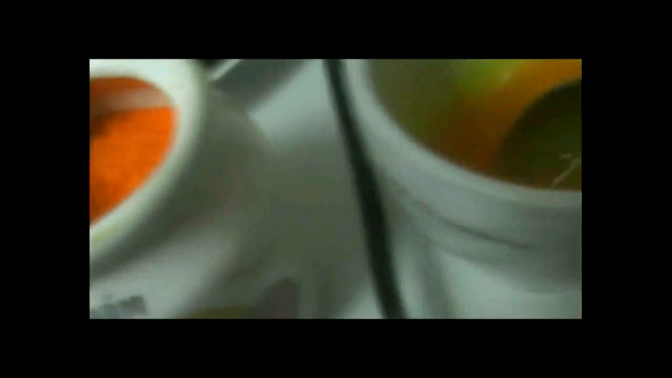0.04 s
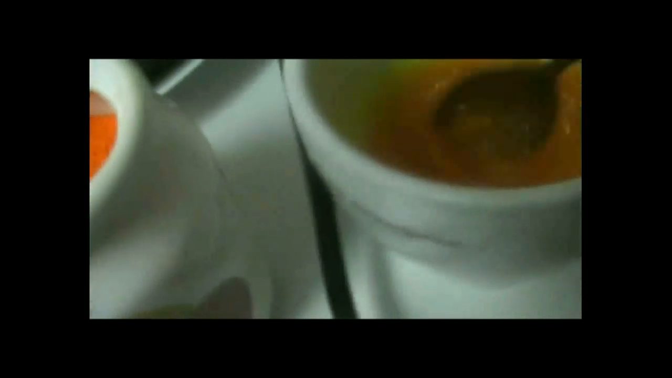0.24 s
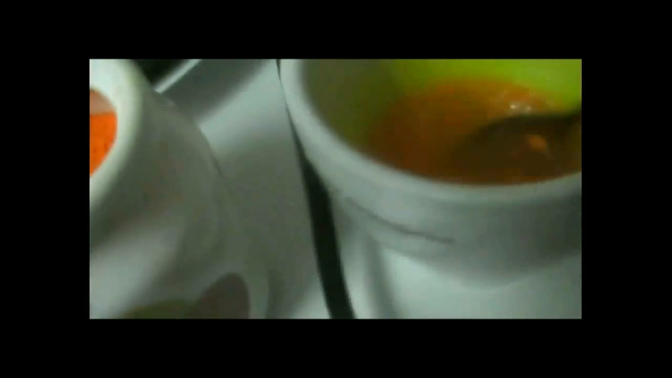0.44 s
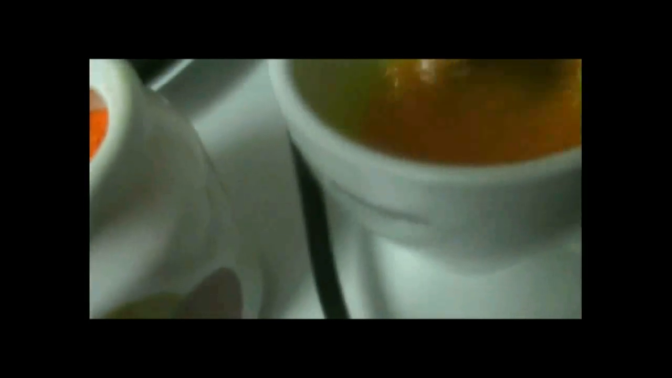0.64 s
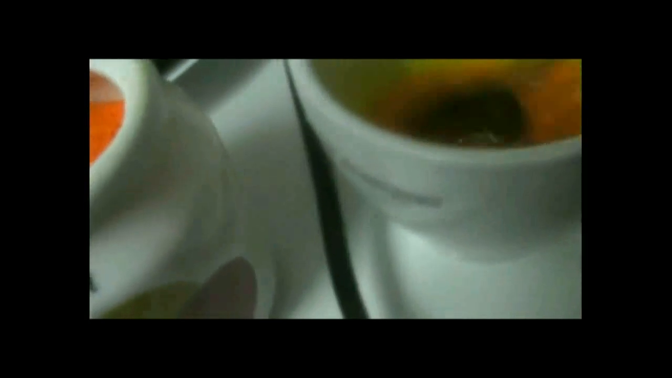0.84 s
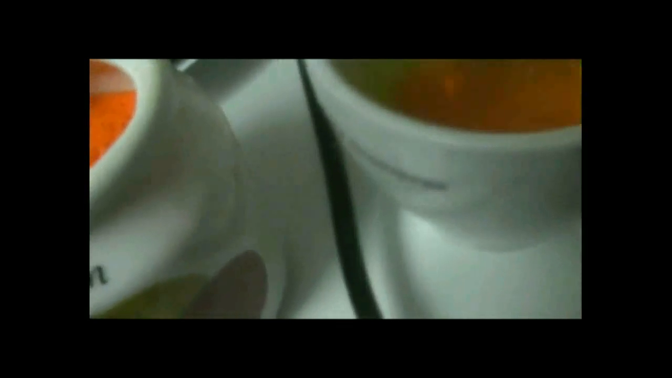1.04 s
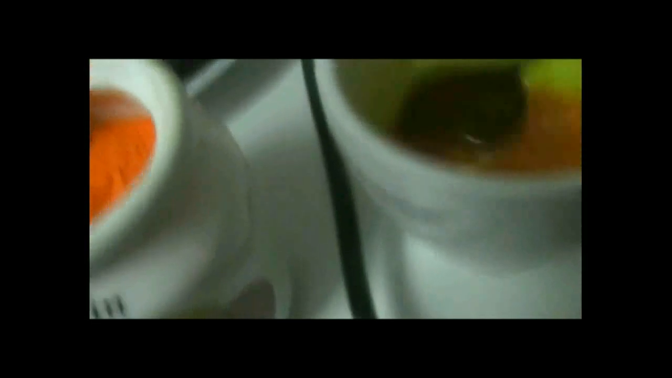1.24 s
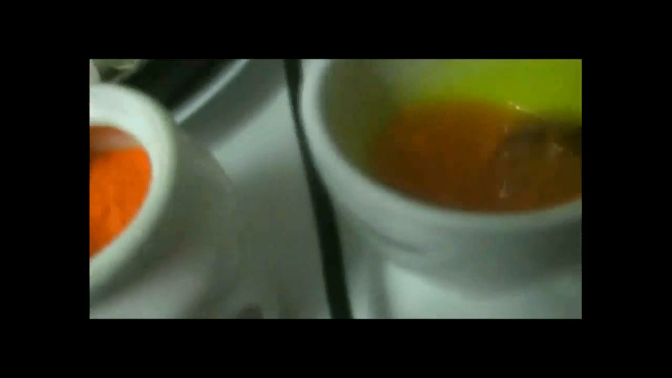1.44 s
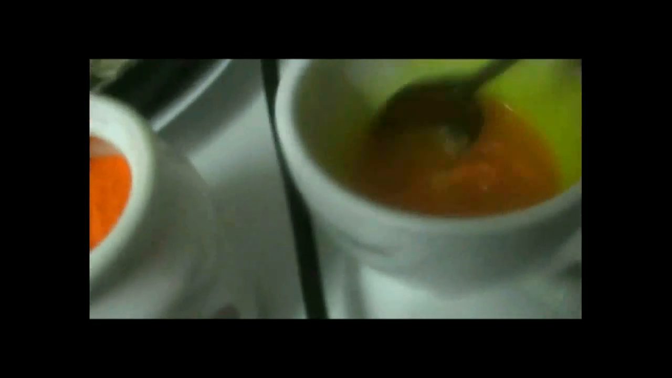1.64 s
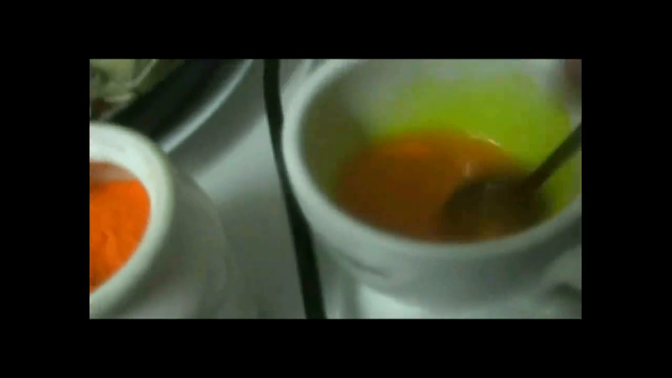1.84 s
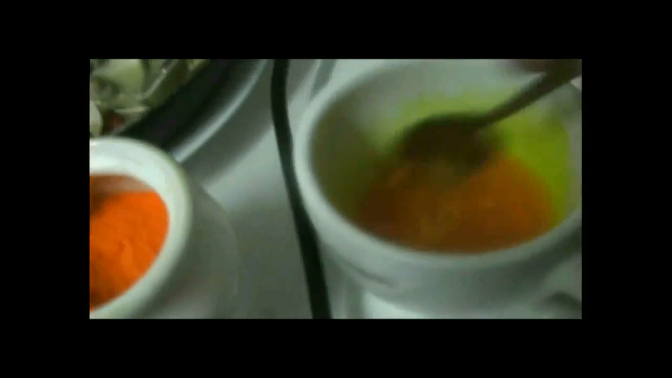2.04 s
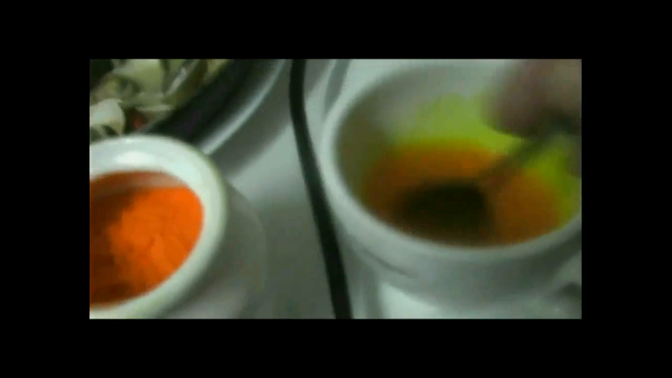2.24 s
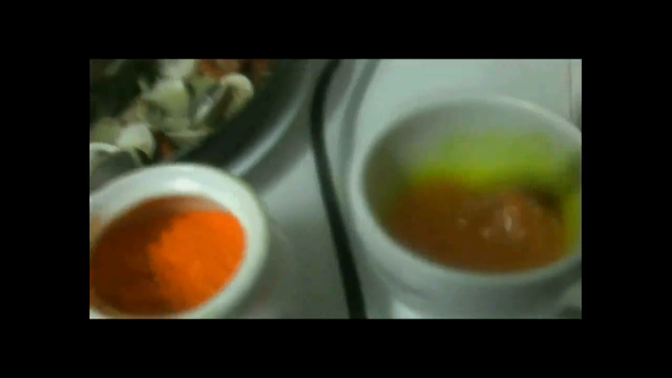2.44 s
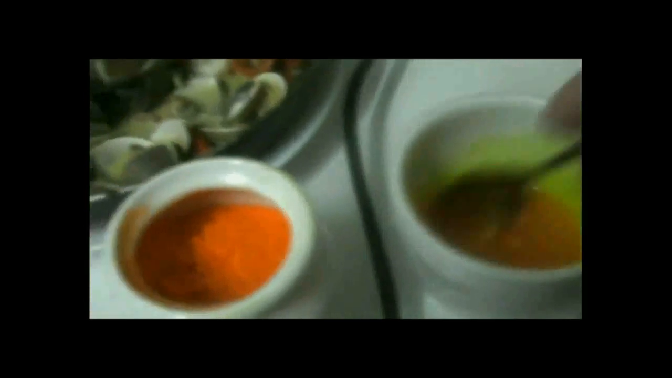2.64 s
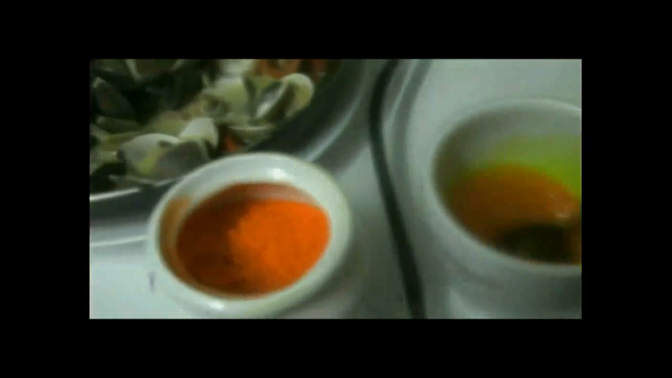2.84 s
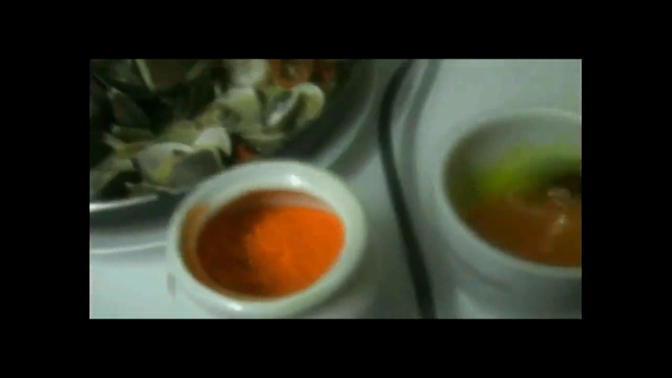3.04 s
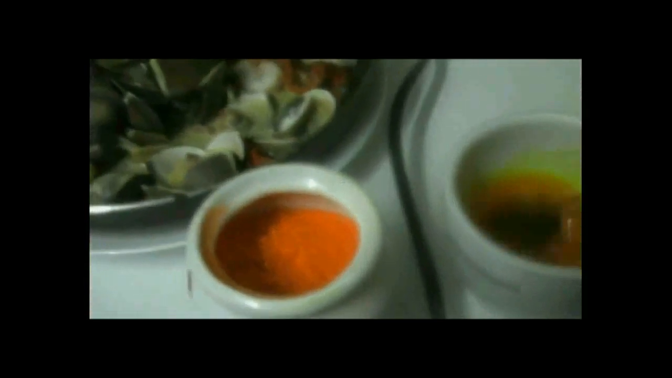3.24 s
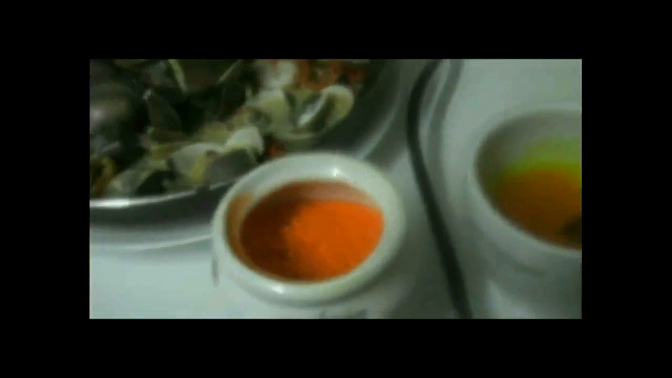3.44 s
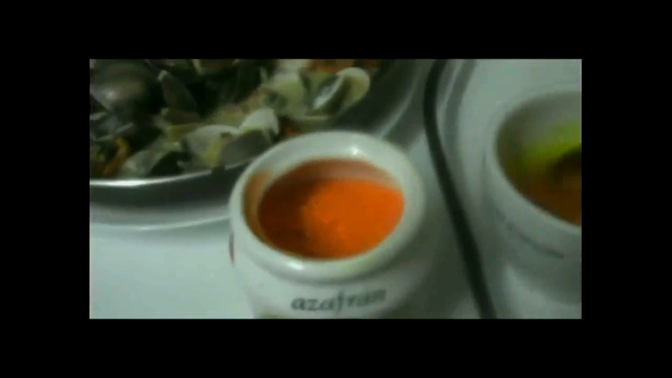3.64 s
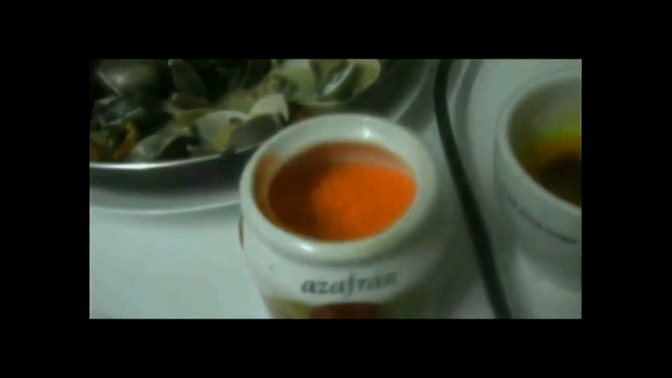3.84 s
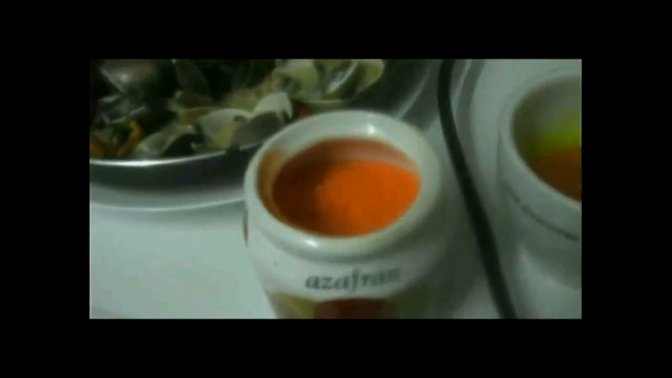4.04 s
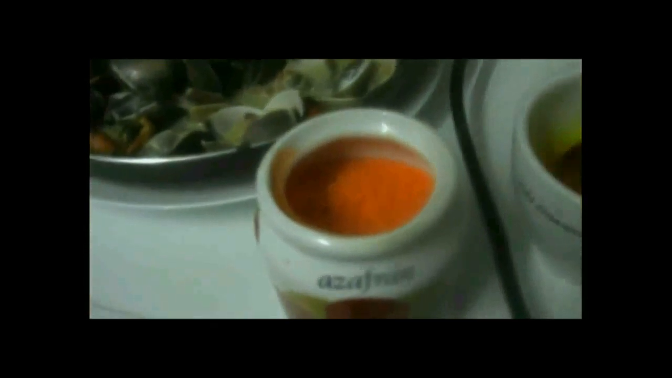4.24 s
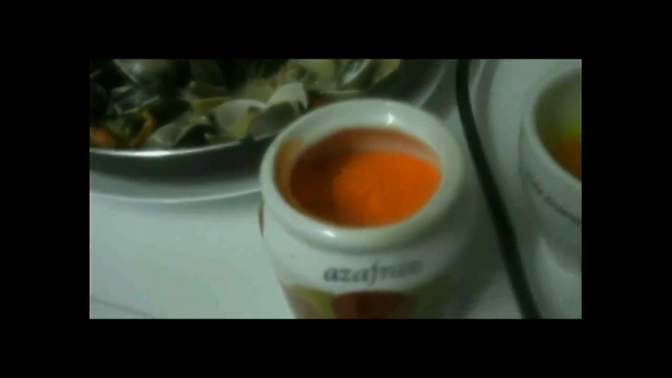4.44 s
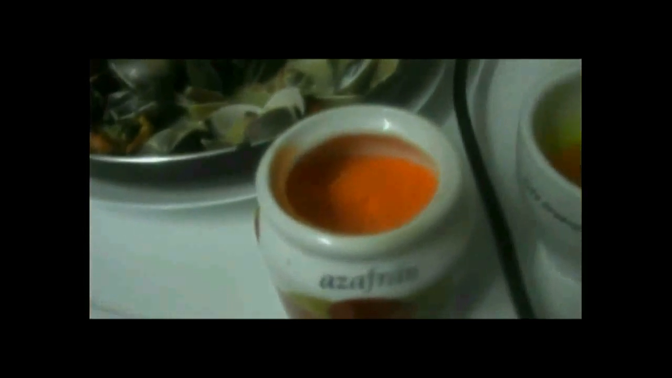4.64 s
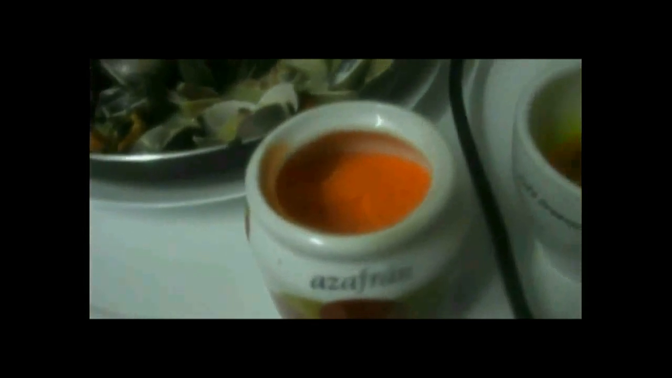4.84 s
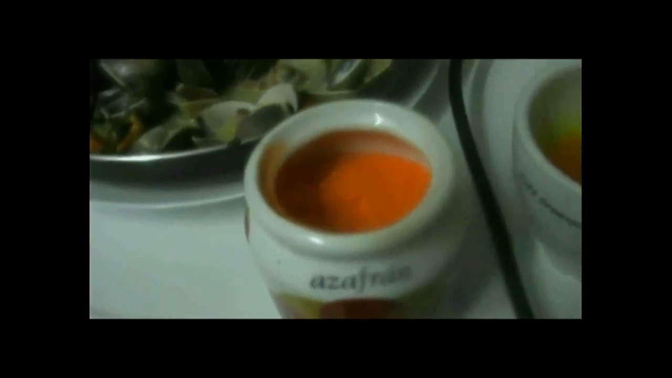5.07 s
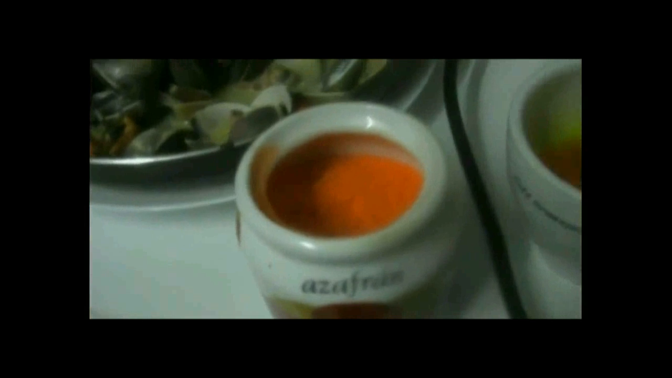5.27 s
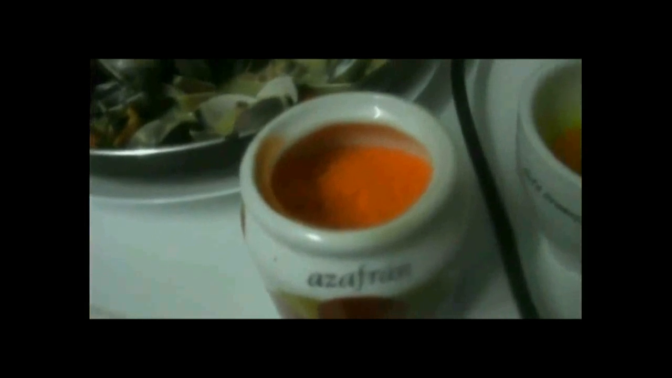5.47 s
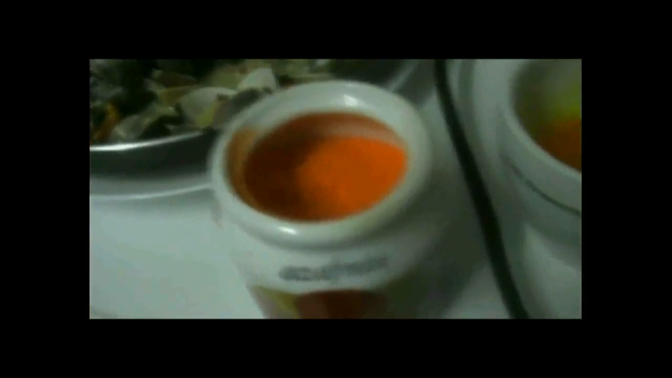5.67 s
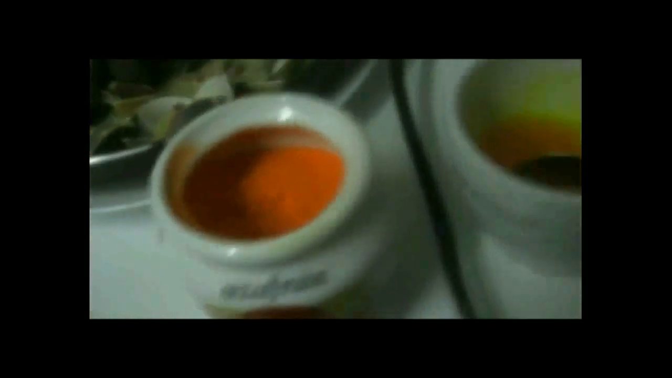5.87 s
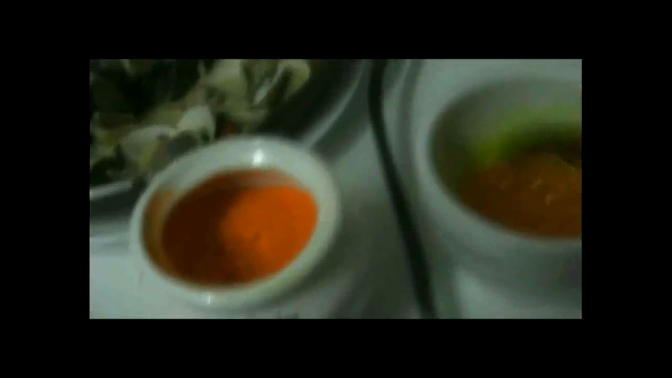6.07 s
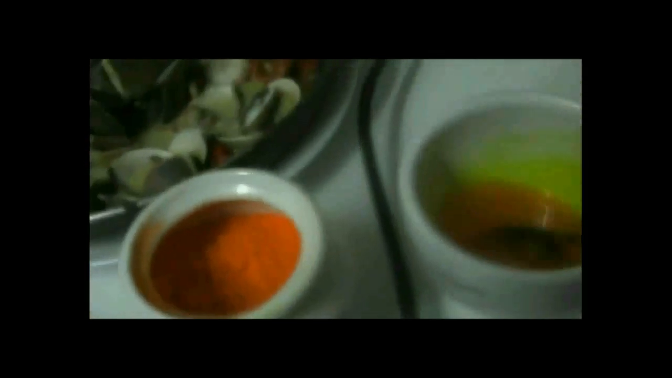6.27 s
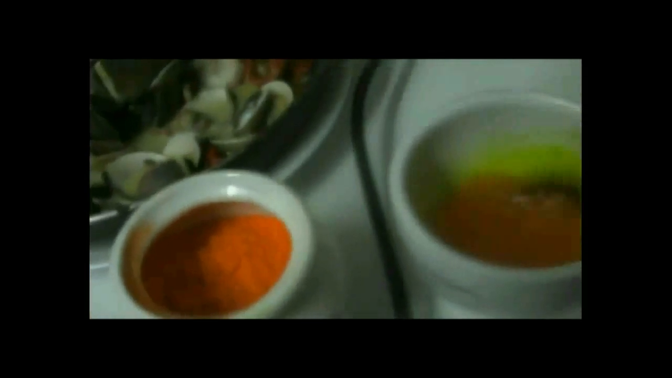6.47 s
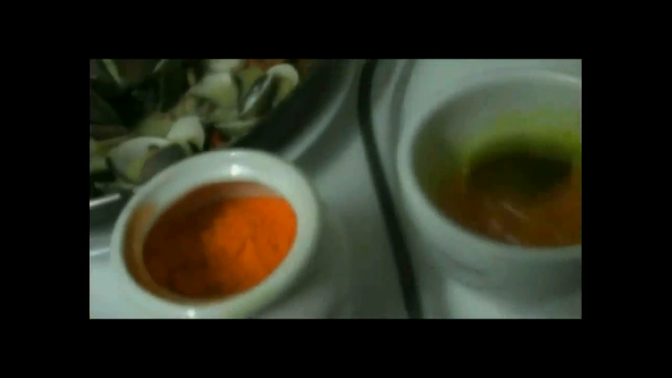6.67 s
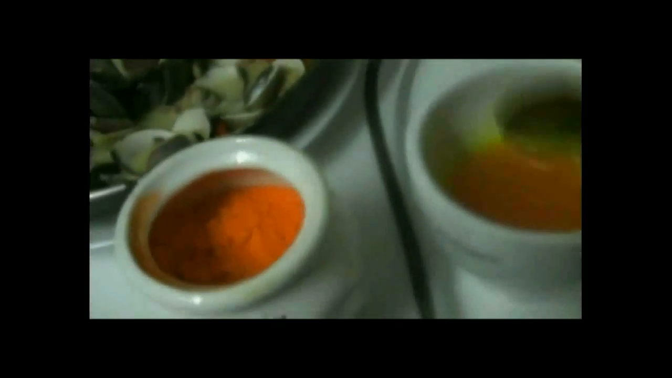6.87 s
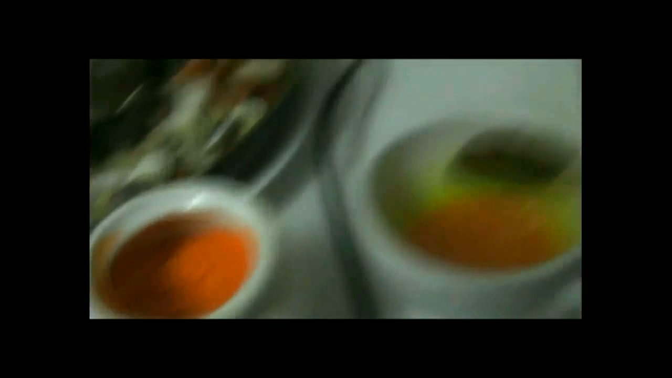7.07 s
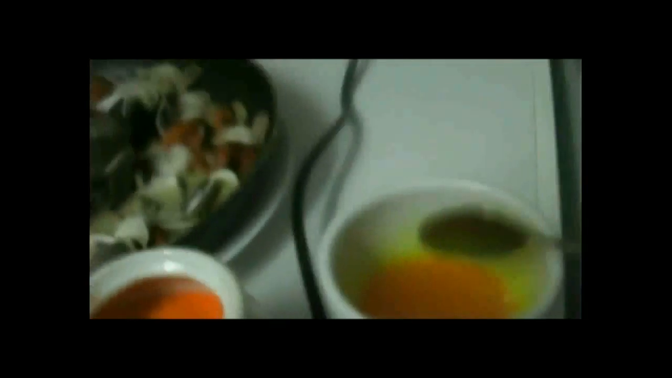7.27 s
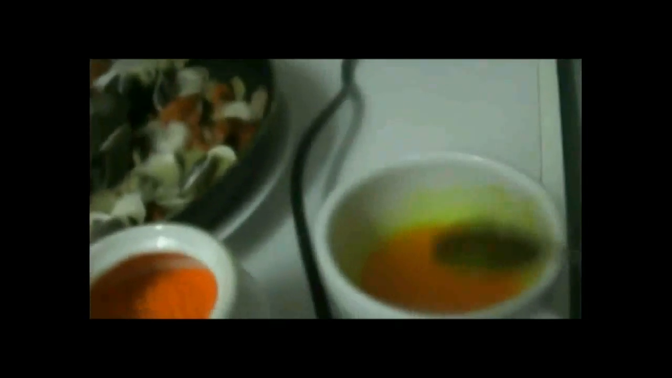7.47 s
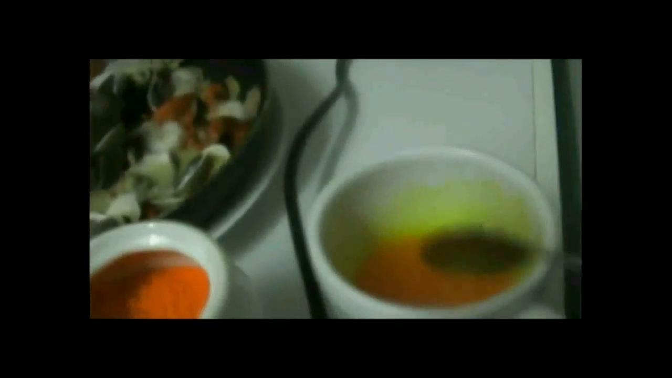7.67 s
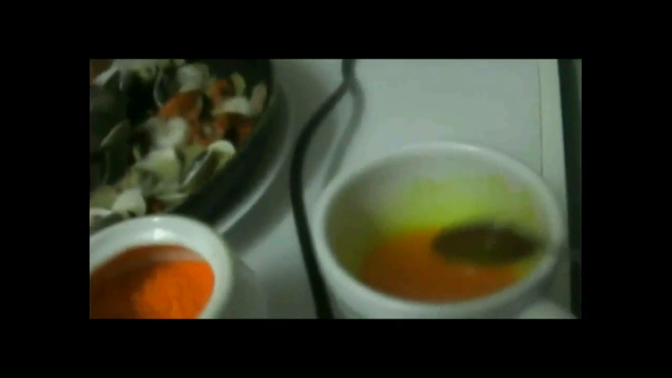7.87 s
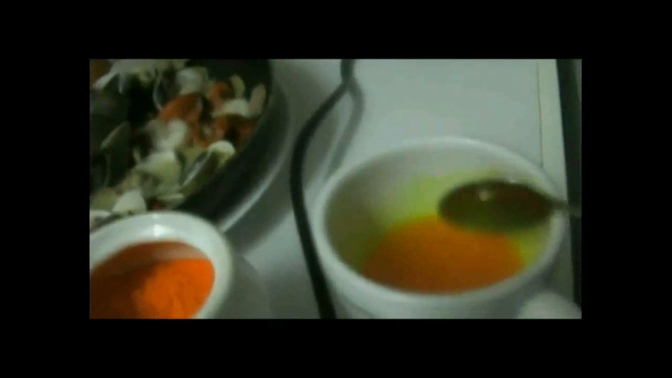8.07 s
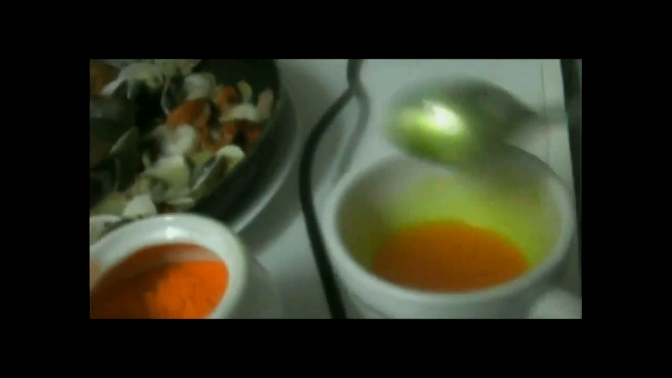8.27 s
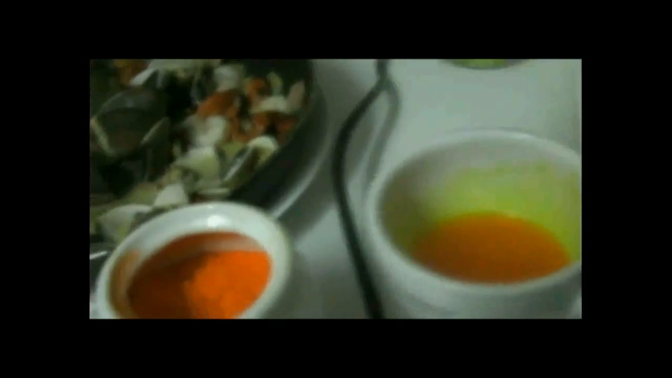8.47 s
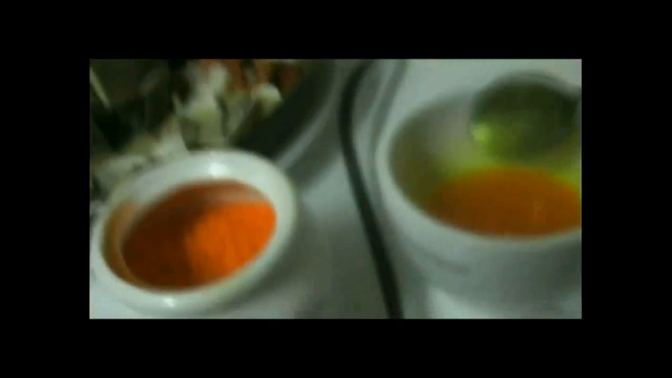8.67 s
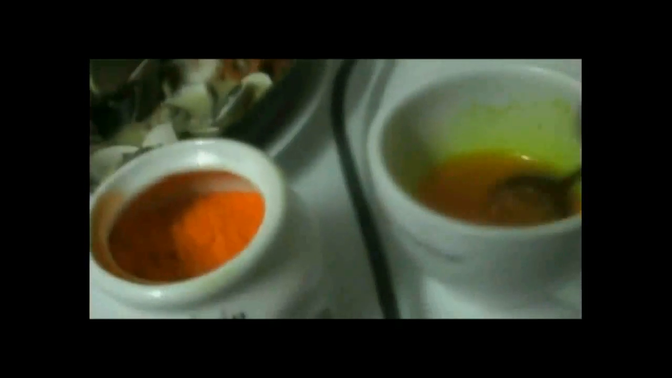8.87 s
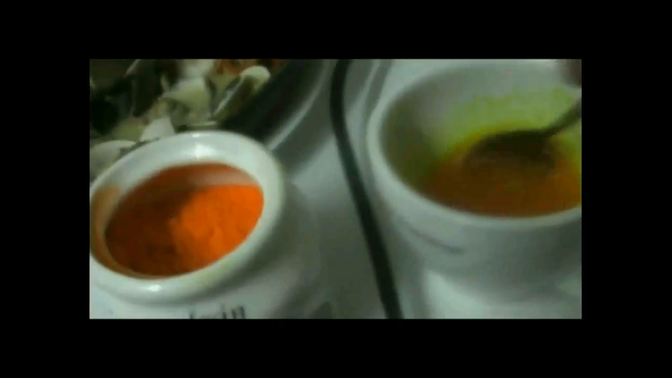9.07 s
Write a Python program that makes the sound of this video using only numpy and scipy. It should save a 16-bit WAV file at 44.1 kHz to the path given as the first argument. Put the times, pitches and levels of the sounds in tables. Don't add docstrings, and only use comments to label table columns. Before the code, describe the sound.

A metal spoon stirs thin sauce in a ceramic cup, picked up closely in stereo in a small kitchen with a short reverberation. From 0 to about 5.2 seconds the clinks are quick and irregular, roughly three to six a second, bright but short and damped by the liquid, each with a dull cup knock and a soft thud in the counter, over a faint gritty scrape. A pause follows until about 6.1 seconds. Between 6.2 and 6.8 come heavier blows, the cup ringing clear and high, with a strong scrape across the glaze. A sharp tap lands at 7.5 and two small ones near 7.8, with a faint slide until 8. Then there is mostly low steady fan hum and room air until a very hard clack at 8.9, followed by rapid rattling touches and a growing scrape, cut off at about 9.1.

```python
import sys
import numpy as np
from scipy import signal
from scipy.fft import rfft, irfft, next_fast_len
from scipy.io import wavfile
from scipy.ndimage import uniform_filter1d

SR = 44100
rng = np.random.default_rng(int(sys.argv[2]) if len(sys.argv) > 2 else 0)


def boost(x):
    u = np.asarray(x, float) / 20
    return 10 ** u


def wrap_up_sound(samples):
    columns = np.atleast_2d(samples).T
    tamed = np.clip(columns, -1, 1)
    steps = np.round(tamed * 32767).astype(np.int16)
    wavfile.write(sys.argv[1], SR, steps)


N = 401736

# frequency in Hz, level in dB per Hz.
AIR_SPECTRUM = [(15, -52), (25, -31.5), (117, -37.5), (149, -17), (263, -22), (335, -14.5), (451, -21.5),
                (489, -6.5), (575, -17.5), (1260, -17), (2050, -35.5), (2990, -22), (3520, -31),
                (9320, -32), (16000, -53)]
# frequency in Hz, left-right correlation.
AIR_LIKENESS = [(60, 0.53), (180, 0.98), (550, 0.96), (1650, 0.98), (4970, 0.93), (15000, 0.01)]
# frequency in Hz, level in dB rms, wobble in dB.
MOTOR_HUM = [(48.6, -80, 14.5), (93.6, -65.5, -1.5), (153.4, -62, -2.5), (298.4, -63, 7), (345, -66.5, 4),
             (491, -46.5, 1)]
# start in seconds, foot level in dB, foot pitch in Hz,
# counter level in dB, counter pitch in Hz.
KNOCKS = [(0.163, -21.5, 1400, -35.5, 479), (0.2302, -22.5, 1380, -40, 331),
          (0.6037, -17.5, 1402, -34.5, 339), (0.8664, -14.5, 1588, -40, 493), (1.1962, -19, 1398, -41, 498),
          (1.5304, -34.5, 1310, -42, 490), (1.8635, -22.5, 1307, -42.5, 484),
          (2.1495, -17.5, 1383, -39, 345), (2.2416, -26, 1270, -39, 484), (2.4392, -25.5, 1385, -40, 487),
          (2.7797, -22.5, 1340, -36, 371), (3.0237, -27, 1604, -36, 199), (3.189, -22.5, 1417, -39.5, 167),
          (3.488, -19.5, 1384, -35.5, 202), (3.7211, -23, 1566, -36.5, 336),
          (4.0229, -21, 1400, -37.5, 342), (4.3005, -29, 1410, -44, 493), (4.6658, -18.5, 1606, -39, 194),
          (5.0568, -32, 1390, -40, 170), (5.1423, -30, 1410, -31, 498), (6.1717, -18, 1580, -30.5, 218),
          (6.3611, -24.5, 1110, -26.5, 334), (6.547, -26, 1375, -23.5, 342),
          (6.7376, -15.5, 1210, -36, 161), (7.497, -12.5, 1275, -28.5, 342), (8.9239, -5, 1566, -30.5, 487),
          (9.0114, -26, 1500, -40.5, 484)]
# ratio to the foot pitch, level in dB, T60 in seconds.
FOOT_MODES = [(1.001, 2, 0.042), (.8, -11, 0.025), (0.8, -14.5, 0.014)]
# ratio to the counter pitch, level in dB, T60 in seconds.
COUNTER_MODES = [(1.001, -1, .14), (1.6, -2, 0.12), (2.2, 7.5, 0.051), (3.5, -8, .06), (0.405, -7, 0.16)]
RIM_HZ = [3262, 3540, 8031, 8297]
RIM_T60_S = [0.58, 0.6, 0.27, 0.23]
# time in seconds, pitch ratio, decay ratio.
LOADING = [
    (0, .998, .7),
    (5.0, .998, .7),
    (6.0, 1, 1),
    (9.11, 1, 1),
]
# start in seconds, dull wall clack in dB, ring of the four
# rim modes in dB.
CUP_BLOWS = [(0.163, -4, -43, -43, -39, -43), (0.2304, -9, -24, -34, -44, -50),
             (0.256, -16, -31.5, -55, -53, -56), (0.4304, -23, -46, -44, -53, -61),
             (0.604, -4, -22.5, -20, -31, -15), (0.8664, -16, -34, -24.5, -34, -38),
             (1.1962, -9, -34, -48, -42, -44), (1.5319, -13, -22, -50, -52, -47),
             (1.5633, -20, -43, -53, -59, -61), (1.5947, -11, -40, -33.5, -51, -50),
             (1.6312, -17, -48, -40, -31, -33), (1.8618, -13, -32, -33, -44, -43),
             (1.9021, -12, -42, -42, -51, -52), (2.151, -5, -37, -39, -42, -40),
             (2.2413, -1.5, -28, -33, -39, -46), (2.3885, -14, -27, -38, -36, -48),
             (2.4344, -15.5, -34, -37, -47, -49), (2.533, -14, -51, -44, -61, -64),
             (2.7116, -17.5, -28, -25, -47, -42), (2.7427, -21, -27, -29, -49, -45),
             (2.7826, -5, -35.5, -33.5, -39, -51), (3.0235, -8, -24, -22.5, -34, -41),
             (3.1901, -21, -29, -17, -38, -34), (3.3363, -15.5, -29.5, -25.5, -38, -39),
             (3.489, -9, -27, -30.5, -44, -50), (3.6995, -24.5, -44, -33, -43, -57),
             (3.7209, -13, -38, -31.5, -36, -36), (4.0248, -11, -38, -34.5, -28, -39.5),
             (4.2567, -10, -26, -16, -40, -45), (4.582, -18, -35, -38.5, -55, -59),
             (4.6643, -7.5, -26, -27, -33, -17), (4.6932, -15, -40, -36, -39, -32.5),
             (4.7217, -13, -44, -33.5, -45, -54), (4.9217, -24.5, -49, -68, -51, -50),
             (5.0579, -16, -20.5, -23.5, -28, -14), (5.1382, -7.5, -25, -29.5, -33, -29),
             (6.1719, -0.5, -16.5, -6, -11, -19), (6.2158, -5, -9.5, -9, -16.5, -25),
             (6.548, -5, -14.5, -22, -20, -16), (6.5745, -7.5, -8.5, -23, -25, -23.5),
             (6.7381, -4, -15, -2.5, -18.5, -22), (7.4966, -4, -32, -30, -24, -19),
             (7.7493, -17.5, -43, -32, -54, -38), (7.7912, -18, -34.5, -25, -49, -46),
             (8.9256, -0.5, -33, -44, -28, -32), (9.0104, -14, -46, -51, -37, -31),
             (9.0405, -16, -46, -50, -36, -35), (9.0917, -19, -31, -36, -44, -46)]
# frequency in Hz, level in dB, T60 in seconds.
WALL_MODES = [(2680, -10, 0.023), (2992, -7, 0.035), (3280, 2.5, 0.029), (3616, -0.5, 0.025)]
# time in seconds, scrape level in dB, bowl pitch in Hz,
# share ringing the rim in dB.
STROKES = [
    [(0.0, -47.5, 5470, 4.5), (0.2, -45.5, 5070, -9), (0.68, -43, 5660, -16), (0.77, -42.5, 5180, -2.5),
     (1.94, -44.5, 5300, -13), (2.29, -42.5, 4980, 0), (2.59, -46.5, 5230, -19), (4.19, -50.5, 5140, -11),
     (4.28, -55, 5910, -6), (4.55, -47.5, 5470, -14), (5.45, -54, 5170, -3)],
    [(6.1, -65, 5570, -8), (6.42, -36.5, 5040, 5), (7.1, -61, 5580, 2)],
    [(7.45, -67, 5430, -10), (7.652, -53, 5150, -10), (8.0, -59, 5300, 10.5)],
    [(8.88, -59, 5170, -11), (8.962, -55.5, 5190, 0), (9.11, -37, 5620, 2)],
]
# ratio to the bowl pitch, width in Hz, level in dB.
SCRAPE_BANDS = [(.58, 240, -14), (1.001, 392, -2), (1.35, 900, -4.5), (1.799, 600, -4), (2.099, 596, -13)]
# start in seconds, bowl level in dB, bowl pitch in Hz,
# stem level in dB, stem pitch in Hz, rattle after the blow in dB.
SPOON_BLOWS = [(0.1637, -6.5, 5090, -19, 8020, -18), (0.2294, -9.5, 5225, -33, 7000, -19.5),
               (0.2913, -30, 5340, -29, 10000, -9), (0.379, -20.5, 5150, -24, 9620, -20),
               (0.6038, -3, 5870, -7.5, 9860, -14.5), (0.8667, -9, 5040, -16, 9600, -28),
               (1.1964, -5.5, 4947, -11.5, 9390, -19), (1.288, -39, 4900, -40, 9990, -15),
               (1.358, -31, 5600, -45, 10100, -22), (1.492, -21, 5590, -32, 9560, -5),
               (1.531, -29, 5520, -31, 6800, -19), (1.5754, -30, 4800, -55, 9000, -12),
               (1.5963, -23, 4530, -44, 7820, -12), (1.6299, -13, 5390, -21, 11280, -14.5),
               (1.8629, -10, 5200, -24, 7780, -19.5), (1.9038, -18, 5280, -51, 8100, -15),
               (2.1096, -36, 5100, -43, 9440, -7), (2.141, -4, 5130, -40, 7440, -24),
               (2.1492, -4, 5060, -20, 9150, -16), (2.2414, -7.5, 4650, -31, 6700, -14),
               (2.375, -18, 5750, -25.5, 8010, -6), (2.44, -9.5, 4936, -32, 9310, -27),
               (2.5282, -29, 4600, -42, 11200, -16), (2.71, -22.5, 4800, -32, 8400, -13),
               (2.7796, -8.5, 5040, -18.5, 9170, -22.5), (3.023, -18.5, 5790, -15.5, 9050, -13),
               (3.045, -16, 5100, -38, 7610, -17), (3.1902, 2.5, 5210, -13.5, 9910, -24.5),
               (3.2528, -16, 5160, -34, 10000, -7.5), (3.472, -12.5, 5190, -30, 10200, -23),
               (3.4898, -12.5, 4800, -26, 7600, -22), (3.7215, -9, 4890, -16, 7355, -10.5),
               (4.0153, -15.5, 5100, -13, 8930, -10), (4.0239, -6.5, 5075, -26, 9100, -22),
               (4.2521, -12.5, 5010, -13.5, 8340, -12), (4.2842, -15, 5230, -36, 8230, -7.5),
               (4.2994, -11, 6010, -17.5, 7460, -12), (4.5381, -30, 4960, -30.5, 7460, -12),
               (4.58, -30, 5090, -42, 7420, -23), (4.6649, -2, 5620, -8.5, 8250, -8),
               (4.774, -16, 4580, -28, 9530, -25), (4.796, -16, 5060, -38, 9510, -18.5),
               (5.0563, -4.5, 5630, -6.5, 7830, 0), (5.1427, -9, 5230, -13.5, 9270, -6),
               (5.213, -26, 5150, -26, 8020, -9.5), (6.1697, -3, 5570, -9.5, 7940, -19),
               (6.2147, -8, 5640, -20, 8030, -5), (6.3622, -5, 4750, -2.5, 7080, -1),
               (6.5475, -9, 5526, -4, 7150, -5), (6.7359, -15, 5620, -15, 8380, -13.5),
               (7.4971, 0, 5036, -5.5, 9330, -13.5), (7.7483, -15.5, 5040, -23, 10640, -8),
               (7.7868, -18.5, 5530, -28, 10060, -13), (8.9231, -2.5, 6400, -6.5, 7090, -2),
               (9.0126, -5.5, 5810, -12, 7080, -2), (9.0424, -7, 6280, -8, 9170, -10),
               (9.0648, -10.5, 5090, -21, 8970, -17), (9.0795, -11, 5870, -26, 7100, -12)]
# ratio to the bowl pitch, level in dB, T60 in seconds.
BOWL_MODES = [(.9, -18, .05), (1.001, 1, 0.051), (1.12, -8, 0.031), (1.24, -23, 0.043)]
# frequency in Hz, level in dB, T60 in seconds.
STEM_MODES = [(7160, -7, 0.05), (9280, -1, 0.047), (10000, -14, .05), (11470, -12, .04), (12260, -13, .04),
              (14400, -30, 0.033)]
# frequency in Hz, left minus right in dB.
PORT_TILT = [(60, -0.5), (180, 1), (550, 4), (1650, 0.5), (4970, 1.5), (15000, 0)]
# frequency in Hz, lead of the left in radians.
PORT_LEAD = [(0, 0), (6890, 0.027), (8010, 0.37), (8790, -1.8), (11100, -0.54), (11500, -1.2),
             (15500, -1.1), (15900, -2.8)]
# frequency in Hz, T60 in seconds.
KITCHEN_T60 = [(200, 0.66), (3000, 0.37), (14000, 0.22)]


def rms_one(x):
    return x / np.sqrt(np.mean(x ** 2) + 1e-20)


def at_hz(points, hz):
    point_hz, value = np.transpose(points)
    return np.interp(np.log(hz), np.log(point_hz), value)


def in_time(rows, axis):
    return np.interp(np.arange(N) / SR, np.array(rows)[:, 0], np.array(rows)[:, axis])


def drift(rate_hz):
    r = np.exp(-80 * np.pi * rate_hz / SR)
    slow = signal.lfilter([1], [1, -2 * r, r * r], rng.standard_normal(N // 40 + 2002))[2000:]
    return np.interp(np.arange(N) / 40, np.arange(len(slow)), rms_one(slow))


def resonance(x, hz, width_hz):
    r = np.exp(-np.pi * width_hz / SR)
    poles = [1, -2 * r * np.cos(2 * np.pi * hz / SR), r * r]
    return signal.lfilter([(1 - r * r) / 2, 0, (r * r - 1) / 2], poles, x)


def stereo_band(noise, low, high):
    return signal.sosfilt(signal.butter(2, [low, high], "band", fs=SR, output="sos"), noise)


def add(out, hit, s):
    start = round(s * SR)
    out[start:start + len(hit)] += hit


def blow_time():
    return np.arange(SR // 8) / SR


def onset(t, rise_s=0.00086):
    return 1 - np.exp(-t / rise_s)


def clack(modes, pitch, level_db, t, rough):
    hz, mode_db, t60 = np.transpose(modes)[:, :, None]
    chance = rng.standard_normal((2, len(modes), len(t)))
    r = np.exp(-2 * np.pi * rough * np.mean(hz * pitch) / SR)
    waver = signal.lfilter([np.sqrt(1 - r * r)], [1, -r], chance[0] + 1j * chance[1])
    swing = np.imag((1 + waver) * np.exp(2j * np.pi * hz * pitch * t))
    return (boost(level_db + mode_db - 60 * t / t60) * swing).sum(axis=0)


def room_air(level_db=-43.5, patchy_db=1.0):
    out, edges = 0, 25 * 2 ** np.arange(0, 9.5, 1 / 3)
    white = rng.standard_normal((2, 2, N))
    for k, (low, high) in enumerate(zip(edges, edges[1:])):
        mid, side = stereo_band(white[k % 2], low, high)
        hz = np.sqrt(low * high)
        alike = np.clip(at_hz(AIR_LIKENESS, hz), -1, 1)
        ports = np.sqrt(1 + alike) * mid + np.sqrt(1 - alike) * side * [[1], [-1]]
        out = out + boost(at_hz(AIR_SPECTRUM, hz) + patchy_db * drift(12)) * ports
    return boost(level_db) * rms_one(out)


def fan_motor():
    t, hum = np.arange(N) / SR, 0
    for hz, db, wobble_db in MOTOR_HUM:
        height = np.sqrt(2) * boost(db + wobble_db * drift(7.5))
        hum = hum + height * np.sin(2 * np.pi * hz * t + 0.4 * drift(3))
    return hum


def foot_and_counter():
    out, t = np.zeros(N + SR), blow_time()
    for s, foot_db, foot_hz, counter_db, counter_hz in KNOCKS:
        add(out, onset(t) * clack(FOOT_MODES, foot_hz, foot_db - 4, t, rough=0.056), s)
        thud = clack(COUNTER_MODES, counter_hz, counter_db + 3, t, rough=0.087)
        add(out, onset(t, rise_s=0.0082) * thud, s)
    return out[:N]


def cup_ring(swell_s=0.002):
    blows, t, out = np.array(CUP_BLOWS), np.arange(N) / SR, 0
    last = np.searchsorted(blows[:, 0], t) - 1
    pitch, lasting = in_time(LOADING, axis=1), in_time(LOADING, axis=2)
    r = np.exp(-1 / (swell_s * SR))
    for k, (hz, t60) in enumerate(zip(RIM_HZ, RIM_T60_S)):
        fallen_db = 60 * (t - blows[last, 0]) / (t60 * lasting)
        ring_db = blows[last, 2 + k] - fallen_db + 1.42 * drift(25.3)
        height = signal.lfilter([1 - r], [1, -r], boost(ring_db) * (last >= 0))
        phase = 2 * np.pi * np.cumsum(hz * pitch) / SR + rng.uniform(0, 6.6)
        out = out + np.sqrt(2) * height * np.sin(phase)
    return out


def cup_wall():
    out, t = np.zeros(N + SR), blow_time()
    for s, wall_db, *_ in CUP_BLOWS:
        add(out, onset(t) * clack(WALL_MODES, 1, wall_db - 7, t, rough=0.012), s)
    return out[:N]


def spoon_scrape(slips_per_s=6000):
    rows = [row for stroke in STROKES for row in stroke]
    n, sliding = np.arange(N), 0
    for stroke in STROKES:
        sliding = sliding + ((n > stroke[0][0] * SR - 1) & (n < stroke[-1][0] * SR))
    gain = uniform_filter1d(sliding * boost(in_time(rows, axis=1)), size=800) * boost(2.1 * drift(31))
    turns = np.cumsum(in_time(rows, axis=2) * boost(0.19 * drift(3))) / SR
    broad = 0
    for ratio, width_hz, db in SCRAPE_BANDS:
        slips = (rng.random(N) < slips_per_s / SR) * rng.exponential(1, N)
        slips = slips * np.exp(2j * np.pi * rng.random(N)) + 1e-18
        band = signal.lfilter([1], [1, -np.exp(-np.pi * width_hz / SR)], slips)
        band = band * np.exp(2j * np.pi * ratio * turns)
        broad = broad + boost(db + 7.5 * drift(5.32)) * rms_one(band.real)
    driven = rng.standard_normal(N) * gain * boost(in_time(rows, axis=3))
    low_rim = 17.7 * resonance(driven, RIM_HZ[0] - 6, 20)
    high_rim = 34.0 * resonance(driven, RIM_HZ[1] - 8, 13)
    return 0.65 * gain * broad + low_rim + high_rim


def spoon_blows():
    out, t = np.zeros(N + SR), blow_time()
    for s, bowl_db, bowl_hz, stem_db, stem_hz, rattle_db in SPOON_BLOWS:
        crack, rattle = rng.standard_normal((2, len(t)))
        crack = crack * boost(bowl_db - 5.5 - 60 * t / 0.019)
        rattle = rattle * boost(bowl_db + rattle_db - 60 * t / 0.1) * (1 - t / t[-1])
        hit = resonance(crack, 4200, 7200) + resonance(rattle, 6300, 5800)
        hit += clack(BOWL_MODES, bowl_hz, bowl_db - 5.5, t, rough=0.014)
        stem_modes = STEM_MODES + [(stem_hz, 0, 0.07)]
        hit += clack(stem_modes, 1, stem_db - 2, t, rough=0.012)
        add(out, onset(t) * hit, s)
    return out[:N]


def at_microphones(x, kitchen_db=-11.5, alike_hz=5300):
    size, t = next_fast_len(N + SR), np.arange(SR // 2) / SR
    hz = np.maximum(np.arange(size // 2 + 1) * SR / size, 1)
    half = boost(at_hz(PORT_TILT, hz) / 2) * np.exp(0.5j * at_hz(PORT_LEAD, hz))
    tail, edges = 0, [80, 400, 1500, 4000, 7000, 11000, 18000]
    for low, high in zip(edges, edges[1:]):
        noise = stereo_band(rng.standard_normal((2, len(t))), low, high)
        t60 = at_hz(KITCHEN_T60, np.sqrt(low * high))
        tail = tail + noise * boost(-60 * t / t60) * onset(t, rise_s=0.0032)
    mid, side = rfft(boost(kitchen_db) * tail / np.sqrt(np.sum(tail[0] ** 2)), size)
    side = side * hz / np.hypot(hz, alike_hz)
    ports = np.array([half * (1 + mid) + side, (1 + mid) / half - side])
    return irfft(rfft(x, size) * ports, size)[:, :N]


def scene():
    close = cup_ring() + cup_wall() + spoon_blows() + foot_and_counter() + spoon_scrape()
    return at_microphones(close) + room_air() + fan_motor()


def roll_off(x):
    return signal.sosfilt(signal.butter(12, 16340, fs=SR, output="sos"), x)


def record(dry):
    limited = np.clip(1.289 * np.tanh(dry / 1.37), -1, 1)
    return roll_off(limited)


dry = scene()
out = record(dry)
wrap_up_sound(out)
```